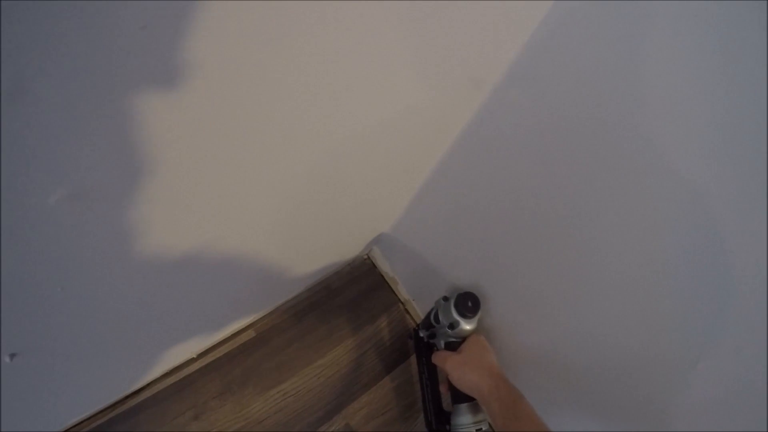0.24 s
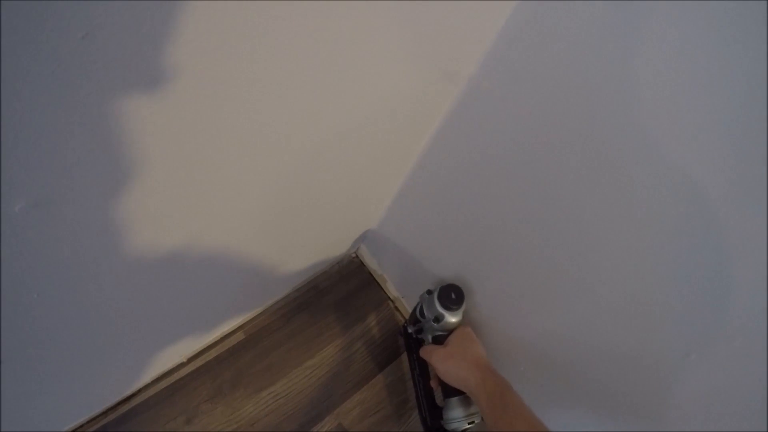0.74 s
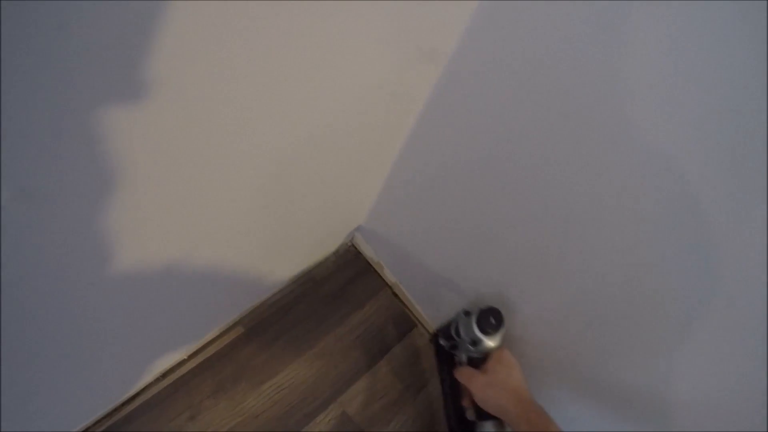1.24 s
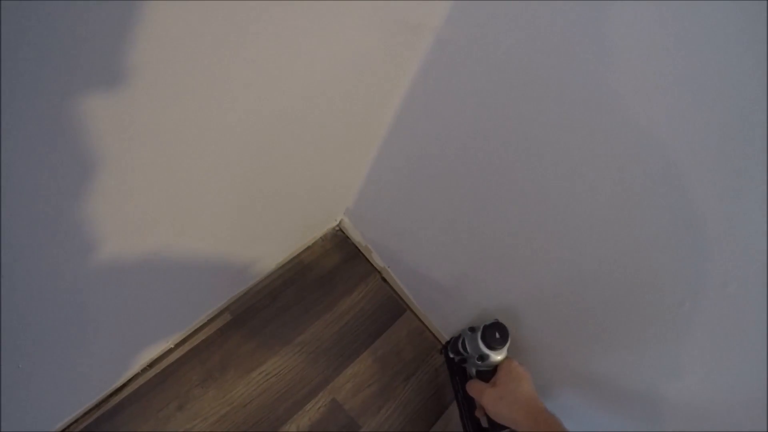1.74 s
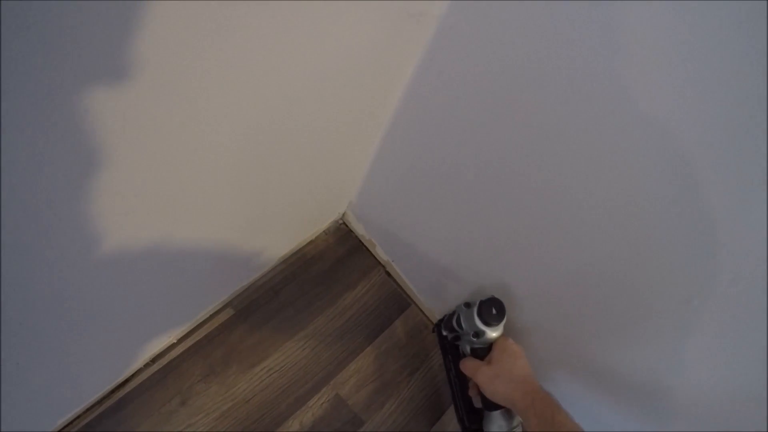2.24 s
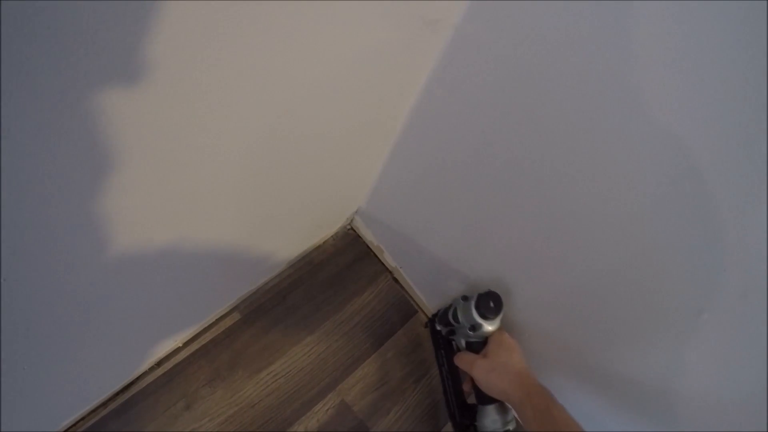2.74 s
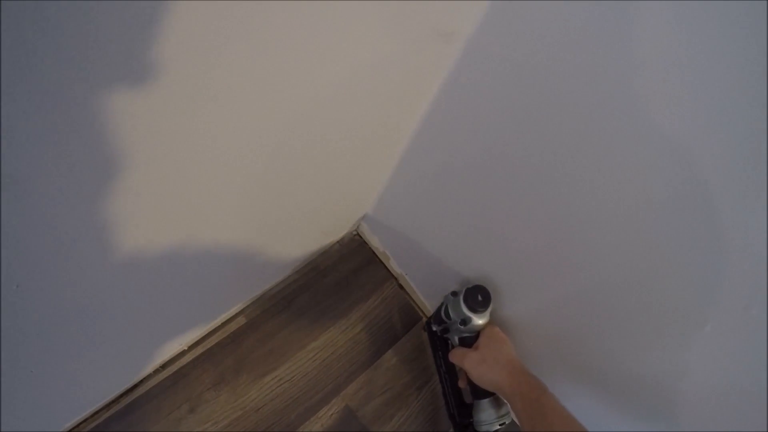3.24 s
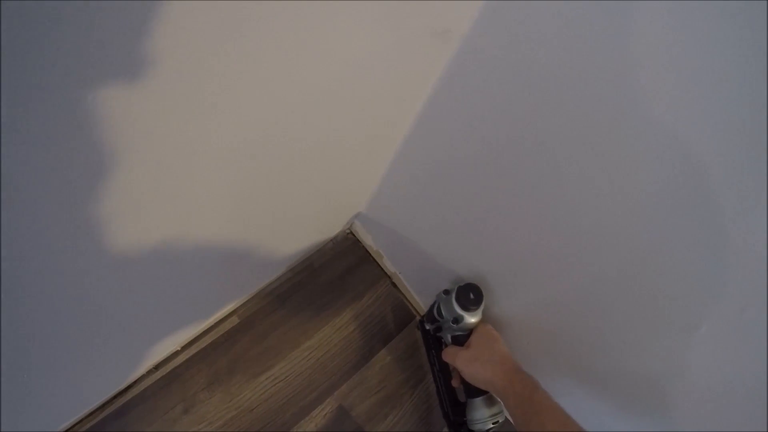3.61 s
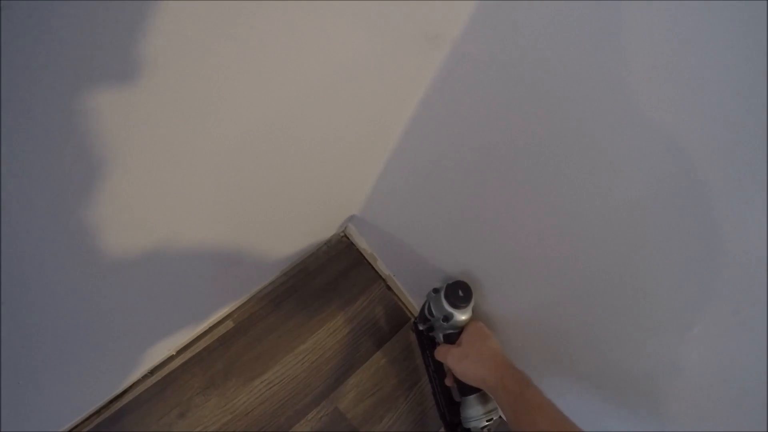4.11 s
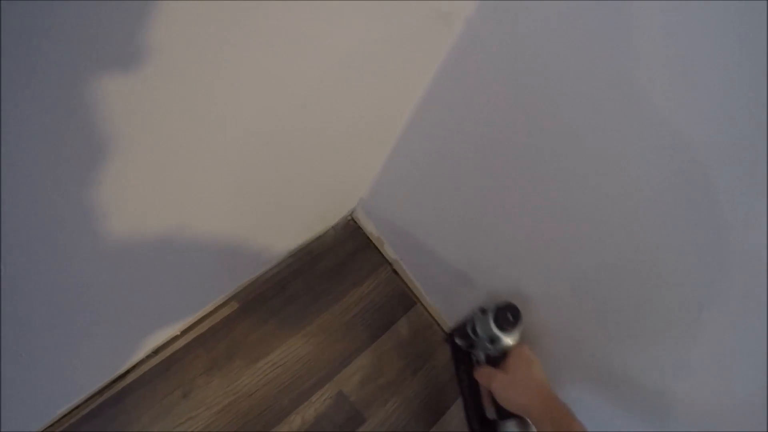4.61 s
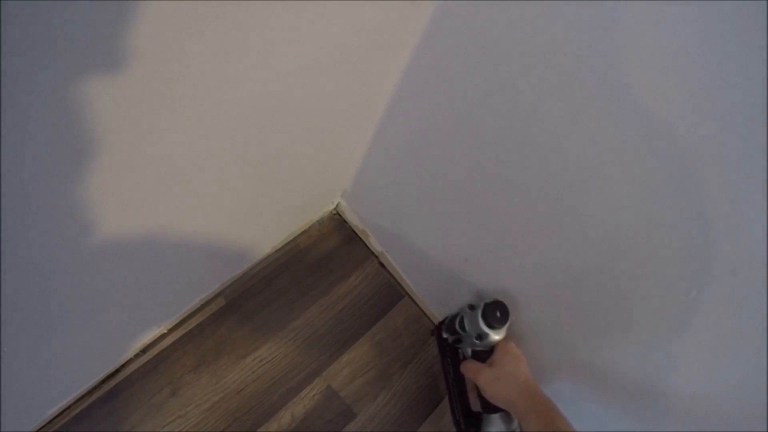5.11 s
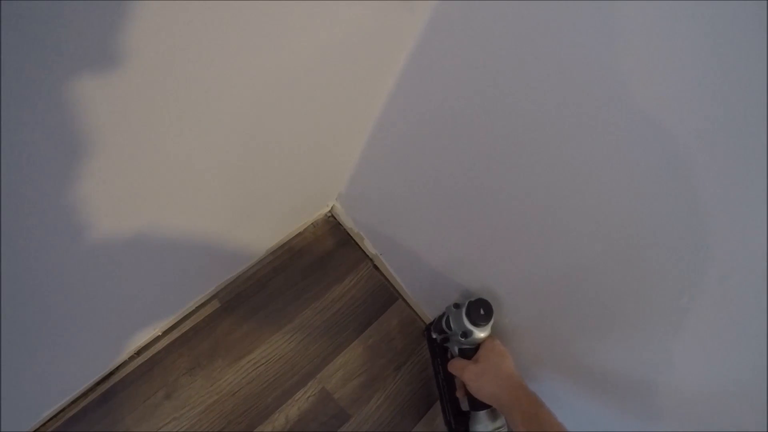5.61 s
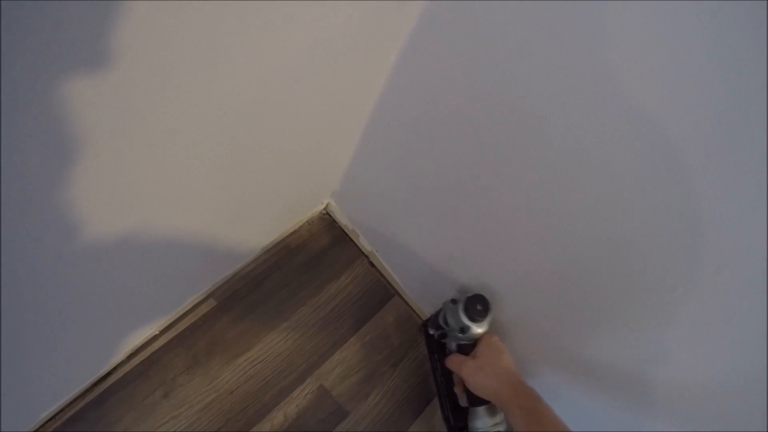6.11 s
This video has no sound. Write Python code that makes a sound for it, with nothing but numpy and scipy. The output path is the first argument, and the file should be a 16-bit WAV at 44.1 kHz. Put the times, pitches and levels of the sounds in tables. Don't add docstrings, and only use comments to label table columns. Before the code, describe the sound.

In a bare, echoing room, a body-worn microphone catches a faint scrape and tick over low rumble, then a loud pneumatic nail gun shot into floorboards, followed by a sharp exhaust puff and piston knock. The background ducks and creeps back. Soft thumps, wooden taps, short drags and metallic rattles follow, growing busier, before a second overloaded shot and puff near the end.

```python
import sys
import numpy as np
from scipy import signal
from scipy.fft import rfft, irfft
from scipy.io import wavfile
from scipy.ndimage import uniform_filter1d, map_coordinates

SR = 44100
rng = np.random.default_rng(int(sys.argv[2]) if len(sys.argv) > 2 else 0)


def bounce(signal):
    frames = np.transpose(np.atleast_2d(signal))
    limited = np.clip(frames, -1, 1)
    pcm = np.round(limited * 32767).astype(np.int16)
    wavfile.write(sys.argv[1], SR, pcm)


def magnitude_from_level(level_db):
    exponent = np.asarray(level_db, float) / 20
    return 10 ** exponent


N = 280035


def rms_one(x):
    return x / np.sqrt(np.mean(x ** 2) + 1e-20)


def at_hz(points, hz):
    table_hz, values = np.transpose(points)
    return np.interp(np.log(hz + 1e-3), np.log(table_hz), values)


def coloured(spectrum, size):
    hz = np.arange(size // 2 + 1) * SR / size
    white = rfft(rng.standard_normal(size))
    return rms_one(irfft(white * magnitude_from_level(at_hz(spectrum, hz)), size))


def drift(rate_hz):
    knots = rng.standard_normal(400)
    return map_coordinates(knots, [np.arange(N) * rate_hz / SR], order=3)


def add(out, start_s, piece):
    i = round(start_s * SR)
    out[i:i + len(piece)] += piece[:N - i]


def fade(t, rise, t60):
    t = np.maximum(t, 0)
    return (1 - np.exp(-t / max(rise, 1e-4))) * magnitude_from_level(-60 * t / max(t60, 0.004))


def resonate(x, hz, width_hz):
    r = np.exp(-np.pi * width_hz / SR)
    b = np.array([1, 0, -1]) * (1 - r * r) / 2
    a = [1, -2 * r * np.cos(2 * np.pi * hz / SR), r * r]
    return signal.lfilter(b, a, x)


def ringing(x, modes):
    out = 0
    for hz, db, t60 in modes:
        width_hz = np.log(1000) / np.pi / t60
        out = out + magnitude_from_level(db) * np.sqrt(t60 * 300) * resonate(x, hz, width_hz)
    return out


def body(x, group):
    out = 0
    tune = magnitude_from_level(rng.normal(0, [0.15, 2.0], (len(group), 2)))
    for (hz, width_hz, db), (pitch, gain) in zip(group, tune):
        once = resonate(x, hz * pitch, width_hz)
        out = out + gain * magnitude_from_level(db) * resonate(once, hz * pitch, 2 * width_hz)
    return out


def grit(size, rough_db):
    return rng.standard_normal(size) * magnitude_from_level(rough_db * np.minimum(rng.exponential(1, size), 4))


def thud(hz, t60, sweep, rise):
    t = np.arange(SR // 4) / SR
    turns = hz * t + sweep * (1 - np.exp(-t / 0.0023))
    wave = np.sin(2 * np.pi * turns) * fade(t, rise, t60)
    return wave / np.abs(wave).max()


def rattle(group, t60, rise, rough_db):
    t = np.arange(SR // 5) / SR
    wave = body(grit(len(t), rough_db) * fade(t, rise, t60), group)
    return wave / np.sqrt(uniform_filter1d(wave ** 2, size=130).max())


PUFF_T = np.arange(16384) / SR


def puff(spectrum, rise, t60):
    return coloured(spectrum, len(PUFF_T)) * fade(PUFF_T, rise, t60)


# pitch in Hz, width in Hz, level in dB.
WOOD = [(385, 110, -5), (567, 310, -1.5), (906.7, 280, -2), (1156, 87, -4.5)]
HOUSING = [(2252, 550, -4), (2665, 590, 2.5), (3210, 350, -7.5)]
STEEL = [(4770, 590, 1), (5300, 940, -1.5), (6050, 250, -6.5), (6530, 350, -7)]
EDGE = [(9000, 3000, -3), (11500, 2800, -4), (13600, 3100, -1)]
# pitch in Hz, width in Hz, level in dB.
BITE = [(2000, 640, -3), (2900, 760, 1), (3600, 500, -2), (4750, 600, 0)]
# frequency in Hz, level in dB per Hz.
BLAST = [(180, -32.5), (300, -7.5), (450, -20), (750, -6), (1120, -4.5), (1390, -7.5), (3700, -20),
         (4590, -14.5), (5080, -22.5), (14700, -40.5), (16000, -46.5)]


def blow(sharp, dull, fire, blow_db, bite_db):
    add(sharp, fire - 0.009, magnitude_from_level(blow_db - 45) * rattle(STEEL + EDGE, 0.1, rise=0.003, rough_db=1.5))
    add(sharp, fire, magnitude_from_level(blow_db - 5.5) * thud(1300, 0.011, sweep=0.05, rise=0.0011))
    add(sharp, fire, magnitude_from_level(blow_db - 17) * rattle(HOUSING + STEEL, 0.056, rise=0.00044, rough_db=1.5))
    add(dull, fire + 0.0013, magnitude_from_level(blow_db + 4) * thud(85, 0.016, sweep=0.7, rise=0.0012))
    add(sharp, fire + 0.0052, magnitude_from_level(blow_db - 0.5) * puff(BLAST, rise=0.0015, t60=0.079))
    add(sharp, fire + 0.008, magnitude_from_level(blow_db + bite_db) * rattle(BITE, 0.074, rise=0.0037, rough_db=3))


# frequency in Hz, level in dB per Hz.
LEAK = [(190, -9.5), (240, -24.5), (295, -5.5), (370, -22), (560, -15), (800, -10), (1190, -8.5),
        (1840, -18), (4670, -17.5), (6850, -32), (15100, -43), (15600, -70)]
# pitch in Hz, width in Hz, level in dB.
LEAK_HISS = [(3720, 700, 0), (4500, 700, 1), (5230, 680, -2)]


def leak(sharp, fire, blow_db, release, hiss_db):
    held = np.clip((release - fire - PUFF_T) / 0.0033, 0, 1)
    add(sharp, fire + 0.001, magnitude_from_level(blow_db - 10.5) * puff(LEAK, rise=0.0057, t60=0.45) * held)
    hiss = rms_one(body(grit(len(PUFF_T), rough_db=2), LEAK_HISS)) * fade(PUFF_T, 0.01, 0.53)
    add(sharp, fire + 0.01, magnitude_from_level(blow_db + hiss_db) * hiss * np.roll(held, -400))


# frequency in Hz, level in dB per Hz.
SHUDDER = [(25, -20.5), (45, 1), (95, -2), (180, -6.5), (300, -5), (450, -34), (900, -61)]
# frequency in Hz, level in dB per Hz.
JET = [(470, -33.5), (800, 0), (1660, -11), (2600, -4.5), (3900, -11.5), (4750, -0.5), (6300, -2.5),
       (8130, -11.5), (12500, -6), (15100, -6), (15600, -40)]


def exhaust(sharp, dull, release, jet_db, home):
    add(sharp, release, magnitude_from_level(jet_db - 17) * rattle(HOUSING + WOOD, 0.011, rise=0.0004, rough_db=8.5))
    valve_open = np.clip((home - release - 0.003 - PUFF_T) / 0.006, 0.5, 1)
    add(sharp, release + 0.0035, magnitude_from_level(jet_db - 0.5) * puff(JET, rise=0.0067, t60=0.17) * valve_open)
    add(dull, release + 0.0039, magnitude_from_level(jet_db + 2) * thud(88, 0.04, sweep=0.22, rise=0.002))
    add(dull, release + 0.0095, -magnitude_from_level(jet_db - 5) * thud(190, 0.011, sweep=0.02, rise=0.001))
    add(sharp, release + 0.0118, magnitude_from_level(jet_db - 7) * rattle(BITE, 0.0041, rise=0.00028, rough_db=2.5))
    add(sharp, release + 0.012, magnitude_from_level(jet_db + 5) * thud(200, 0.0089, sweep=0.37, rise=0.0001676))
    shaking = puff(SHUDDER, rise=0.0041, t60=0.482) * (1 - PUFF_T / PUFF_T[-1])
    add(dull, release + 0.014, magnitude_from_level(jet_db - 16) * shaking)


def piston_return(sharp, home, home_db):
    add(sharp, home, -magnitude_from_level(home_db + 1.5) * thud(773, 0.0053, sweep=0.21, rise=0.00049))
    add(sharp, home, magnitude_from_level(home_db - 7.5) * rattle(WOOD + HOUSING, 0.01, rise=0.00034, rough_db=6.5))
    add(sharp, home + 0.0016, magnitude_from_level(home_db - 10) * puff(BLAST, rise=0.00072, t60=0.081))


# trigger pulled in seconds, blow in dB, trigger released in seconds, exhaust in dB.
SHOTS = [
    (0.749, 4, 0.9025, 7.5),
    (5.9424, 3.5, 6.0712, 7),
]
BITE_DB = (-12.5, -6)
LEAK_HISS_DB = (-26, -19)
# start in seconds,
# peak in dB, pitch in Hz, T60 in s.
SHOT_SWINGS = [(0.7546, -3.5, 316, 0.054), (0.7600, 1, 183, 0.064), (0.7645, -3, 197, 0.056),
               (0.7702, -6.5, 130, 0.11), (0.9181, 4.5, 143, 0.13), (5.9490, -4, 300.3, 0.012),
               (5.954, -2.5, 182, 0.039), (5.9587, 4.5, 90, 0.05), (6.0865, -4, 100, .09),
               (0.7560, -1, 1320, 0.068), (0.7590, -18, 1905, .04), (5.9490, -4, 1060, 0.051),
               (5.9495, -7.5, 3370, 0.042), (5.9530, -20, 4840, 0.032), (6.1070, -4, 2170, .04),
               (6.1170, -12, 2300, 0.033), (6.1300, -12, 2250, .04), (0.7700, -21, 298, 0.34),
               (5.9620, -18, 297, 0.41), (0.7570, -6.5, 830, .06), (5.9505, -1.5, 788, 0.057),
               (5.957, -8, 690, 0.11), (0.9150, -4, 35, .2), (6.0840, -3, 31, 0.15),
               (5.985, -17, 95, 0.17), (0.955, -6, 95, .08), (6.126, -7, 80, .09)]


def nailer():
    sharp, dull = np.zeros(N), np.zeros(N)
    for (fire, blow_db, release, jet_db), bite_db, hiss_db in zip(SHOTS, BITE_DB, LEAK_HISS_DB):
        home = release + 0.0314
        blow(sharp, dull, fire, blow_db, bite_db)
        leak(sharp, fire, blow_db, release, hiss_db)
        exhaust(sharp, dull, release, jet_db, home)
        piston_return(sharp, home, home_db=jet_db + 1.5)
    for start, db, hz, t60 in SHOT_SWINGS:
        add(dull, start, magnitude_from_level(db) * thud(hz, t60, sweep=0.05, rise=0.00086))
    return sharp, dull


# pitch in Hz, level in dB, T60 in s.
SHELL = [(860, -14, 0.27), (1233.5, -11, .15), (1276, -8, .22), (1570, -14, .2), (1560, -14, .2),
         (2336, -13.5, .25), (2735, -8.5, .4), (2900, -13.5, .3), (3870, -11.5, .35), (4360, -12, .35),
         (4520, -7, .5), (4700, -5, 0.6), (4930, -6.5, 0.54), (5097, -8, .4)]


def tool_shell(sharp):
    return magnitude_from_level(-16) * ringing(sharp, SHELL)


# start in seconds, peak in dB, T60 in s.
BUMPS = [(3.082, -18, 0.045), (3.092, -26, 0.034), (3.168, -13, 0.035), (3.179, -23, .04),
         (3.204, -23, 0.17), (3.214, -19, 0.1), (3.22, -13, 0.019), (3.236, -19, 0.043), (3.286, -12, 0.02),
         (3.297, -18, 0.022), (3.676, -36, 0.033), (3.7, -35, 0.03), (3.717, -33, 0.024),
         (3.727, -33, 0.023), (3.743, -31.5, .03), (3.756, -35, .03), (3.772, -27.5, 0.082),
         (3.783, -31, .04), (3.805, -34, 0.032), (3.816, -37, 0.024), (3.822, -33, 0.038),
         (4.447, -24.5, 0.16), (4.462, -33, 0.1), (4.765, -3, 0.063), (4.803, -19, 0.11),
         (5.057, -8.5, 0.037), (5.068, -23, .04), (5.095, -25, 0.077), (5.307, -17, 0.064),
         (5.326, -20, 0.059), (5.416, -4, 0.035), (5.426, -19, 0.025), (5.434, -14.5, 0.04),
         (5.461, -12, 0.023), (5.509, -13.5, 0.053), (5.535, -23, 0.044), (5.896, -41, 0.079),
         (6.255, -12.5, 0.039)]
# start in seconds, peak in dB, pitch in Hz, T60 in s.
KNOCKS = [(0.714, -40, 187, 0.38), (1.012, -20, 300, 0.09), (1.135, -25.5, 187, .1),
          (1.256, -30, 205, 0.078), (1.254, -28, 560, 0.029), (1.255, -29.5, 1302, 0.02),
          (2.908, -28.5, 299.6, 0.036), (3.0397, -28.5, 905, 0.012), (3.072, -31, 1144, 0.022),
          (3.2252, -19.5, 1100, 0.02), (3.271, -35, 1198, .04), (4.365, -58, 1250, 0.1),
          (4.492, -27, 1156, 0.024), (4.498, -32, 1207, .04), (4.5056, -29, 1225, 0.028),
          (4.519, -28, 1032, .06), (4.52, -30, 5500, .015), (4.5328, -26, 1060, 0.013),
          (4.531, -25, 2740, 0.018), (4.536, -31, 2900, 0.033), (4.543, -28, 2853, 0.045),
          (4.551, -30.5, 1250, 0.035), (4.556, -42, 2800, 0.031), (4.113, -56, 4690, 0.14),
          (4.114, -48, 5270, .03), (4.4828, -28, 89.4, 0.026), (4.52, -36, 290, 0.068),
          (3.051, -46, 3160, 0.022), (3.238, -40, 2610, 0.024), (3.246, -39, 2330, 0.022),
          (4.769, -33, 4730, 0.049), (4.77, -32.5, 5220, 0.055), (4.772, -41, 1276, 0.11),
          (4.77, -35, 2000, 0.04), (5.279, -53, 4920, 0.2), (4.765, -13, 284, 0.027),
          (4.769, -25, 2752, 0.028), (4.771, -62, 2790, 0.24), (4.79, -29.5, 301.5, 0.16),
          (4.7806, -8, 123, 0.015), (5.06, -47.5, 1560, 0.03), (5.068, -55, 3000, .05),
          (2.918, -34, 200, .06), (3.012, -50, 1250, .05), (4.533, -30.5, 396, 0.045),
          (4.44, -38, 388, .06), (5.168, -30.5, 701, 0.058), (5.177, -28, 210, 0.029),
          (5.224, -37, 715, 0.068), (5.47, -26, 943, 0.025)]


def bumps():
    soft, hard = np.zeros(N), np.zeros(N)
    for start, db, t60 in BUMPS:
        add(soft, start + 0.00047, -magnitude_from_level(db - 1.5) * thud(69.5, t60, sweep=0.55, rise=0.0022))
    for start, db, hz, t60 in KNOCKS:
        add(hard, start, magnitude_from_level(db) * thud(hz, t60, sweep=0.14, rise=0.0022))
    return hard + signal.sosfilt(signal.butter(2, 340, fs=SR, output="sos"), soft)


# start in seconds, level in dB, hardness in dB, T60 in s.
TAPS = [(1.254, -21, -1, 0.034), (2.147, -47, -6, 0.021), (2.908, -31, 4, 0.033), (2.914, -41.5, 0, 0.1),
        (3.033, -31.5, 9, 0.021), (3.04, -30.5, 4, 0.07), (3.073, -31.5, 5, 0.023),
        (3.2255, -19.5, 8.5, 0.034), (4.136, -53, -2, 0.024), (5.168, -31, -3.5, 0.05),
        (5.18, -33.5, 8, 0.085), (5.223, -29.5, 0, 0.074), (5.3975, -40.5, 14, 0.065),
        (5.451, -31, 8, 0.074), (5.47, -18, 6.5, 0.043), (5.496, -28, 5, 0.023), (5.692, -38, -1, 0.079)]
# start in seconds, level in dB, share passed to the board in dB, T60 in s.
CLACKS = [(0.713, -48.5, 4.5, 0.14), (3.236, -38, 10, 0.07), (3.247, -34.5, -9, 0.038),
          (3.2705, -33, 6.5, 0.039), (4.443, -34, 0.5, 0.074), (4.493, -35, 6, 0.14),
          (4.521, -29, 3.5, 0.065), (4.533, -30.5, 9, 0.011), (4.551, -43, 12, 0.014),
          (4.766, -30, 3.5, 0.03), (4.769, -28, -7, 0.064), (4.775, -32, 3, 0.059),
          (5.06, -53.5, 12.5, 0.088), (5.345, -37, 8, 0.1), (5.37, -42, 7, 0.071)]
# start in seconds, level in dB, dull part in dB, T60 in s.
TICKS = [
    (0.054, -44.5, -11.5, 0.042),
    (4.113, -40, -16.5, 0.041),
    (5.279, -33, 2, 0.024),
    (5.398, -35, -3, 0.039),
    (5.47, -34.5, -8, 0.032),
    (5.888, -38, 2, 0.057),
]
TAP_DB = (1, -14.5, -16)
TAP_FOLLOWS = (0, 0.37, 0.74)
CLACK_DB = (-0.5, -1.5, -0.5)
CLACK_FOLLOWS = (0.97, -0.14, 0.08)
TICK_DB = (-12, -9, -1)
TICK_FOLLOWS = (2.1, 0.44, 0.026)
# start in seconds, peak in dB, T60 in s.
SPITS = [(0.0543, -66, 0.05), (0.7133, -46.5, 0.042), (2.9075, -52.5, 0.05), (3.0714, -61, 0.05),
         (3.225, -36, 0.039), (3.2464, -48, 0.05), (3.2705, -44, 0.05), (4.113, -51.5, 0.05),
         (4.4425, -48, 0.047), (4.4912, -51, 0.05), (4.5211, -40, 0.05), (4.5324, -48, 0.046),
         (4.7674, -31, 0.058), (5.1774, -40, 0.05), (5.2255, -49, 0.05), (5.2785, -53, 0.05),
         (5.3453, -47, 0.05), (5.3687, -49, 0.05), (5.3981, -40.5, 0.045), (5.4514, -50, 0.05),
         (5.47, -36, 0.04), (5.4954, -51, 0.05), (5.887, -51.5, 0.047)]


def clacks():
    out = np.zeros(N)
    kinds = ((TAPS, TAP_DB, TAP_FOLLOWS), (CLACKS, CLACK_DB, CLACK_FOLLOWS), (TICKS, TICK_DB, TICK_FOLLOWS))
    for rows, kind_db, follows in kinds:
        for start, db, colour_db, t60 in rows:
            levels_db = db + np.array(kind_db) + colour_db * np.array(follows)
            for group, level_db, lasting in zip((WOOD, HOUSING, STEEL), levels_db, (1.0, 0.99, 0.92)):
                hit = rattle(group, t60 * lasting, rise=0.0004, rough_db=3)
                add(out, start, magnitude_from_level(level_db - 4.5) * hit)
    for start, db, t60 in SPITS:
        add(out, start, magnitude_from_level(db - 7) * rattle(EDGE, 0.85 * t60, rise=0.0007, rough_db=3))
    return out


# start, loudest and end in seconds, level in dB, housing share in dB,
# steel relative to housing in dB.
SLIDES = [
    (0.0, 0.003, 0.31, -61, -12, 1),
    (0.561, 0.575, 0.66, -70.5, 1.5, 4),
    (3.162, 3.227, 3.27, -39, -12.5, -3),
    (3.639, 3.76, 3.78, -56.5, -9, -10),
    (4.354, 4.385, 4.7, -63.5, -4, 0.5),
    (4.489, 4.488, 4.81, -47.5, -1.5, -3.5),
    (4.529, 4.543, 4.57, -34.5, 0.5, -5),
    (5.246, 5.254, 5.75, -53, -10, -2),
    (5.425, 5.447, 5.6, -44.5, -9, -2),
]


def slides():
    out, t = np.zeros(N), np.arange(SR // 4) / SR
    for start, top, end, db, metal_db, steel_db in SLIDES:
        stroke = np.interp(t, [0, top - start, end - start], [0, 1, 0]) ** 1.3
        for group, share_db in zip((WOOD, HOUSING, STEEL), (0, metal_db, metal_db + steel_db)):
            scrape = rms_one(body(grit(len(t), rough_db=2.5), group))
            add(out, start, magnitude_from_level(db + share_db) * stroke * scrape)
    return out


# start in seconds, level in dB.
SHELL_HITS = [
    (4.769, -29),
    (4.533, -37),
    (4.113, -56.5),
    (3.702, -60),
    (3.77, -58),
    (3.8, -56),
]
# pitch in Hz, level in dB, T60 in s.
MAGAZINE = [(996, -6, .3), (1276, -10, 0.39), (2030, -16, .3), (2300, -1, .3), (2780, -2, 0.19),
            (2800, 9, 0.14), (3930, -10, .35), (4301, -20, .4), (4750, -8, .5), (4790, -10, 0.34),
            (5152, -6.5, 0.42), (5265, -18, 0.32), (5534, -14, .4)]


def magazine():
    clicks = np.zeros(N)
    for start, db in SHELL_HITS:
        add(clicks, start, magnitude_from_level(db + 13) * rng.standard_normal(6))
    return ringing(clicks, MAGAZINE)


# pitch in Hz, level in dB, T60 in s.
BOARDS = [(40, -20, 0.086), (70, -24, 0.25), (160, -29, 0.33), (299.6, -22.5, 0.28)]


def floor_boards(structure):
    return ringing(structure, BOARDS)


# frequency in Hz, T60 in s.
ROOM_T60 = [(60, 0.63), (200, 0.66), (1000, 0.27), (4500, 0.53), (8000, 0.32), (14000, 0.25)]
# frequency in Hz, level in dB.
ROOM_COLOUR = [(60, -0.5), (190, -4), (300, -0.5), (450, -2), (1200, -1), (2500, 1.5), (4700, -1.5),
               (8000, -1.5), (14000, -1)]


def room(x):
    t, tail = np.arange(SR) / SR, 0
    edges_hz = 45 * 2 ** np.arange(0, 8.6, 0.5)
    white = rng.standard_normal((2, SR))
    for k, (low, high) in enumerate(zip(edges_hz, edges_hz[1:])):
        hz = np.sqrt(low * high)
        bandpass = signal.butter(2, [low, high], "band", fs=SR, output="sos")
        band = signal.sosfilt(bandpass, white[k % 2])
        decay = fade(t - 0.004, 0.00084, at_hz(ROOM_T60, hz))
        tail = tail + band * magnitude_from_level(at_hz(ROOM_COLOUR, hz)) * decay
    return signal.fftconvolve(x, tail / np.sqrt(np.sum(tail ** 2)))[:N]


# frequency in Hz, T60 in s.
WASH_T60 = [(200, .66), (550, 0.74), (850, .55), (1250, 0.64), (2000, 0.62), (4800, 0.65), (8000, 0.48),
            (14000, 0.39)]
# frequency in Hz, level in dB.
WASH_COLOUR = [(200, -4.5), (550, -2), (850, -6), (1250, -2.5), (1900, -2.5), (2750, -3), (3700, -3.5),
               (4900, -5.5), (6500, -4), (9000, 0), (14000, 0.5)]
# pitch in Hz, width in Hz, level in dB.
ROOM_RINGS = [(556, 150, -6), (1250, 260, -6), (2740, 220, -1.5), (4650, 400, 1), (4940, 400, -0.5)]


def wash(x):
    late_db, late_lasts = -22, 1.7
    out, white = 0, rng.standard_normal((2, N))
    edges_hz = 180 * 2 ** np.arange(0, 6.6, 0.25)
    for k, (low, high) in enumerate(zip(edges_hz, edges_hz[1:])):
        hz = np.sqrt(low * high)
        t60 = at_hz(WASH_T60, hz)
        bandpass = signal.butter(2, [low, high], "band", fs=SR, output="sos")
        power = signal.sosfilt(bandpass, x + 1e-18) ** 2
        near = magnitude_from_level(-120 / SR / t60)
        far = magnitude_from_level(-120 / SR / t60 / late_lasts)
        held = signal.lfilter([1 - near], [1, -near], power)
        held = held + magnitude_from_level(late_db) ** 2 * signal.lfilter([1 - far], [1, -far], power)
        noise = rms_one(signal.sosfilt(bandpass, white[k % 2]))
        out = out + magnitude_from_level(at_hz(WASH_COLOUR, hz)) * np.sqrt(held * t60 / 0.32) * noise
    return out + sum(magnitude_from_level(db) * resonate(out, hz, width_hz) for hz, width_hz, db in ROOM_RINGS)


# start, strongest and end in seconds, rubbing in dB.
SHIFTS = [(-.1, 0.0, 0.25, -43), (0.068, 0.482, 0.59, -52), (0.751, 1.201, 1.38, -44),
          (2.81, 2.931, 2.91, -42.5), (2.852, 3.262, 3.48, -35), (3.601, 3.694, 3.96, -45),
          (3.6, 3.802, 3.85, -41.5), (4.204, 4.454, 4.84, -45), (4.49, 4.868, 5.35, -41),
          (4.903, 5.444, 6, -43), (5.749, 5.941, 6.13, -41.5), (5.796, 6.198, 6.4, -43)]
# time in seconds, level in dB.
SWAY = [(0, -53), (.5, -50.5), (1.1, -42), (1.4, -48), (1.7, -47.5), (2.0, -43), (2.25, -45.5), (2.55, -43),
        (2.8, -48), (3.5, -47), (4.15, -45), (4.4, -49.5), (5.3, -46.5), (5.8, -43), (6.35, -47.5)]
# frequency in Hz, level in dB per Hz.
RUMBLE = [(13, -29), (22, 2.5), (43, 0.5), (113, -12.5), (134, -18), (200, -26.5), (260, -53.5),
          (440, -120)]
# frequency in Hz, level in dB per Hz.
RUB = [(65, -32.5), (110, -4), (208, -3), (255, -10), (294, -2.5), (616, -27), (898, -29.5), (3500, -41.5),
       (4550, -72), (7700, -120)]


def movement():
    rest_db = -66
    t = np.arange(N) / SR
    efforts_db = [np.interp(t, [start, top, end], [0, db - rest_db, 0]) for start, top, end, db in SHIFTS]
    effort_db = np.max(efforts_db, axis=0)
    sway_db = np.interp(t, *np.transpose(SWAY)) + 0.53 * effort_db
    rumble = magnitude_from_level(sway_db + 0.59 * drift(21)) * coloured(RUMBLE, size=N + 1)[:N]
    rub = magnitude_from_level(rest_db + effort_db + 0.8 * drift(40)) * coloured(RUB, size=N + 1)[:N]
    return rumble + rub


# frequency in Hz, level in dB per Hz.
HISS = [(76, -31.5), (115, -1), (200, -13), (328, -18), (532, -12), (812, -20), (1460, -22), (2090, -25.5),
        (5620, -28), (15100, -40), (15500, -70)]


def noise_floor():
    return magnitude_from_level(-60.5) * coloured(HISS, size=N + 1)[:N]


def scene():
    sharp, dull = nailer()
    sharp = sharp + tool_shell(sharp)
    handling = clacks() + slides() + magazine()
    structure = dull + bumps()
    wet = room(magnitude_from_level(-4) * handling + magnitude_from_level(-4.5) * structure)
    wet = wet + wash(magnitude_from_level(-1.5) * sharp + magnitude_from_level(-4) * handling)
    direct = sharp + handling + structure + floor_boards(structure)
    return (direct + magnitude_from_level(-11) * wet + movement() + noise_floor())[None]


def band_limit(x):
    return signal.sosfilt(signal.butter(12, 16430, fs=SR, output="sos"), x)


GAIN_DIP_DB = (11.5, 8)


def record(dry):
    attack_s, recovery_db_per_s = 0.0094, 13.5
    t, gain_db = np.arange(N) / SR, 0
    for fire, _, release, _ in SHOTS:
        pulled_db = 0
        for dip_db, start in zip(GAIN_DIP_DB, (fire + 0.0098, release + 0.0091)):
            pulled_db = pulled_db + dip_db * (1 - np.exp(-np.maximum(t - start, 0) / attack_s))
        recovered_db = recovery_db_per_s * np.maximum(t - release, 0)
        gain_db = gain_db - np.maximum(pulled_db - recovered_db, 0)
    x = signal.sosfilt(signal.ellip(6, 0.3, 30, 15050, fs=SR, output="sos"), dry) * magnitude_from_level(gain_db)
    flat = 0.92 * x / (1 + np.abs(x) ** 4) ** (1 / 4)
    cut = signal.sosfilt(signal.cheby2(16, 75, 16900, fs=SR, output="sos"), flat)
    return band_limit(cut)


dry = scene()
out = record(dry)
bounce(out)
```